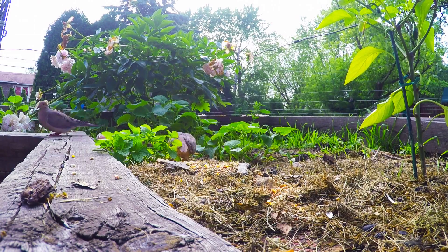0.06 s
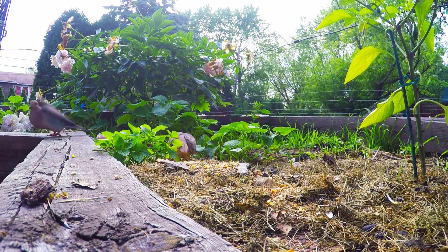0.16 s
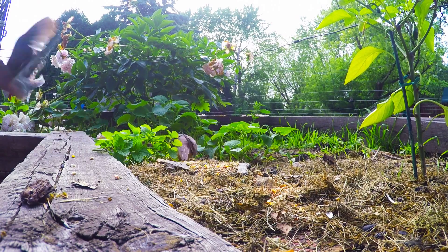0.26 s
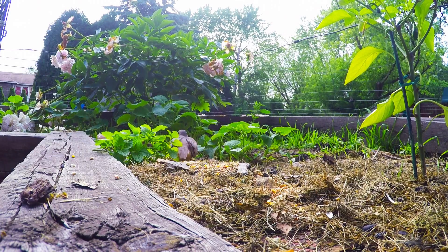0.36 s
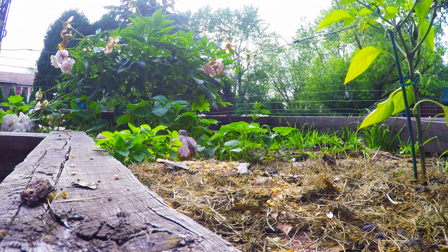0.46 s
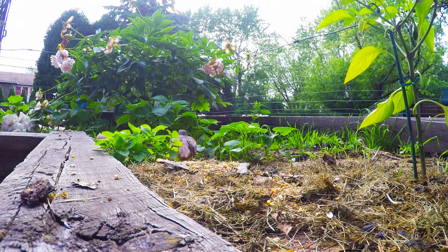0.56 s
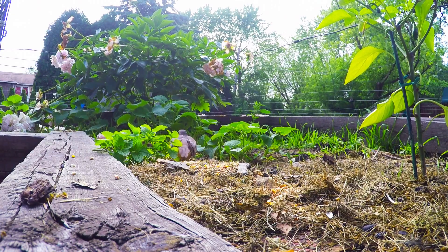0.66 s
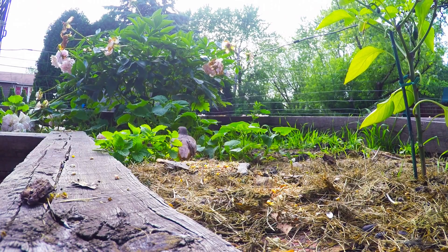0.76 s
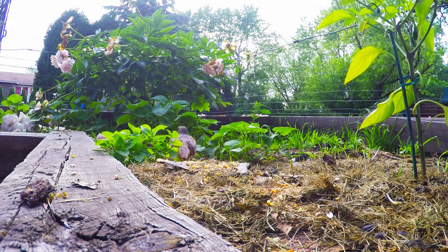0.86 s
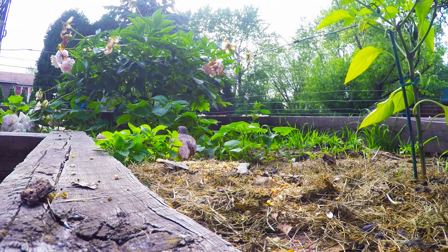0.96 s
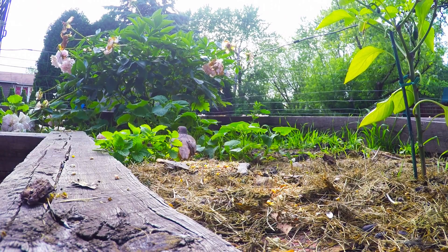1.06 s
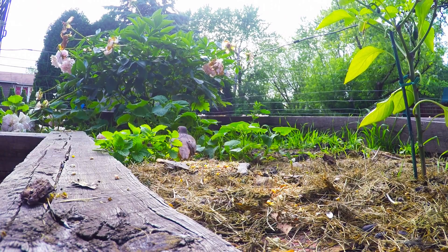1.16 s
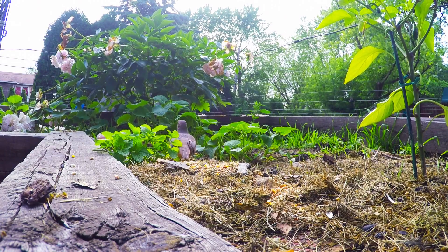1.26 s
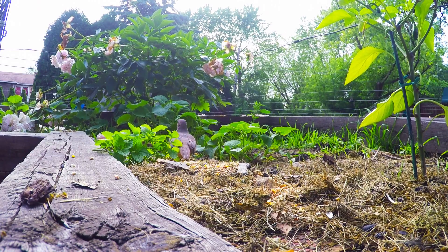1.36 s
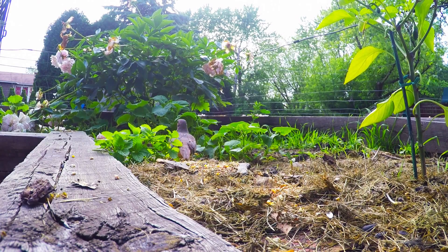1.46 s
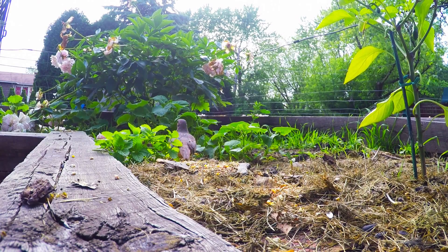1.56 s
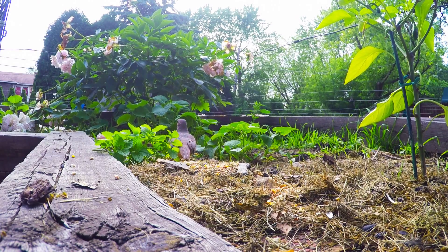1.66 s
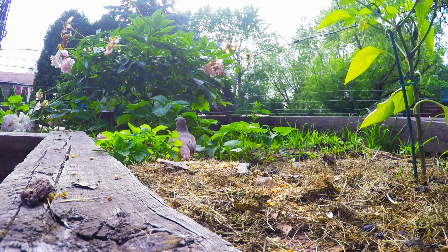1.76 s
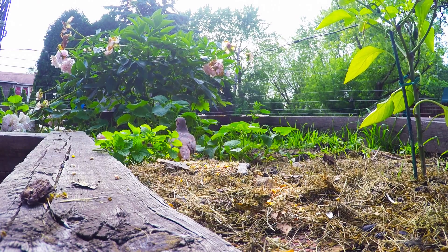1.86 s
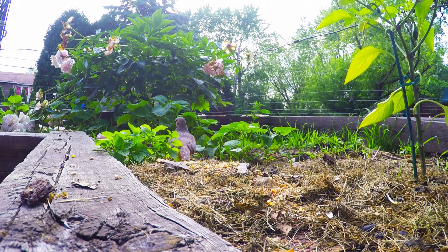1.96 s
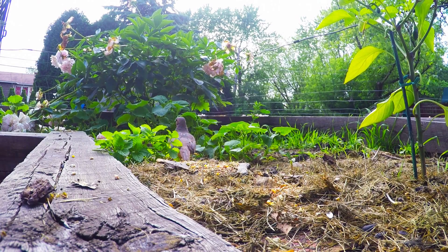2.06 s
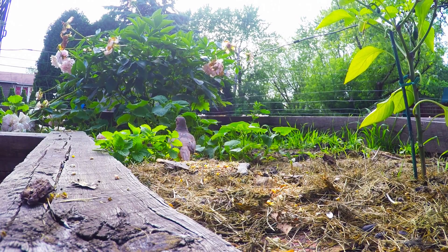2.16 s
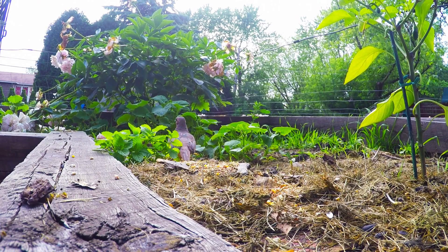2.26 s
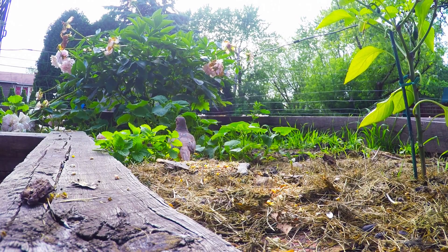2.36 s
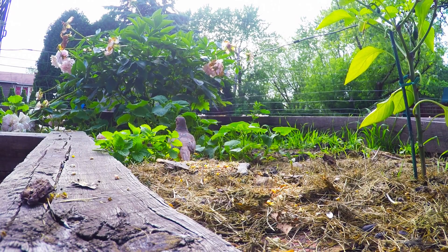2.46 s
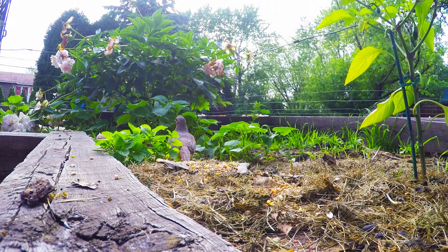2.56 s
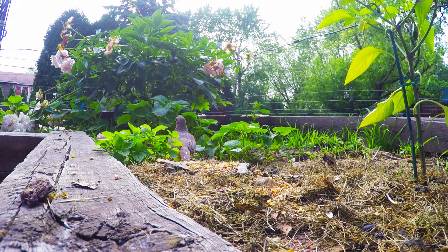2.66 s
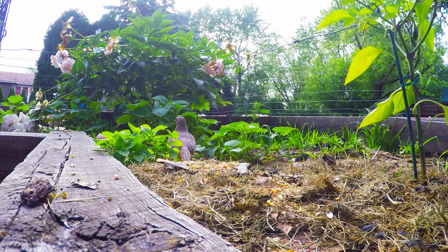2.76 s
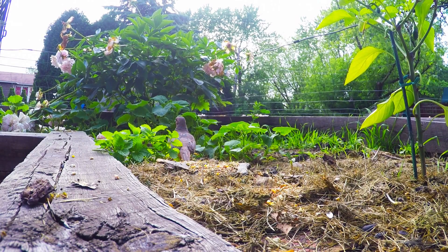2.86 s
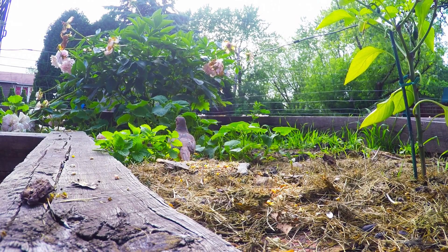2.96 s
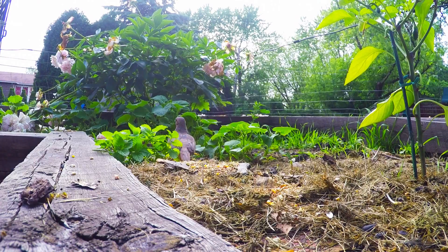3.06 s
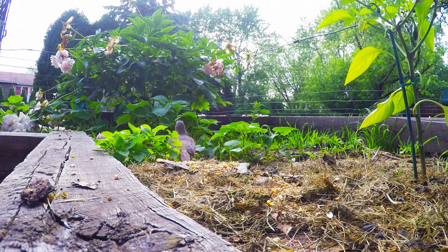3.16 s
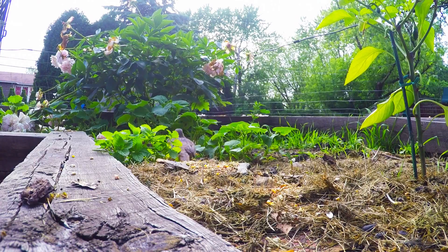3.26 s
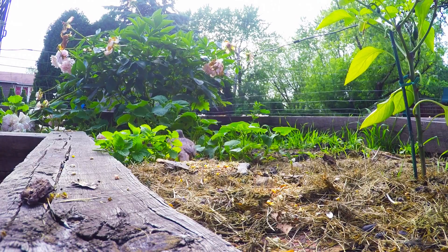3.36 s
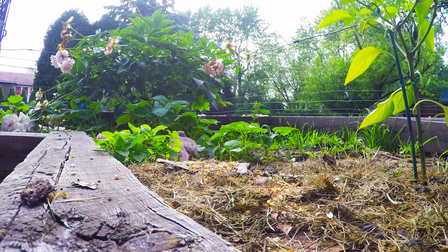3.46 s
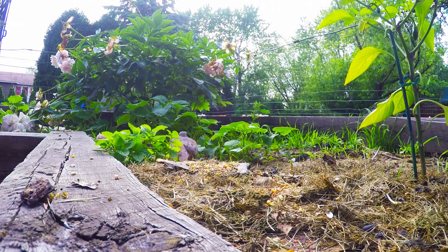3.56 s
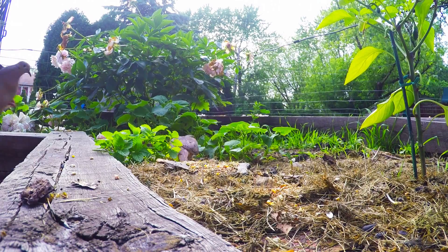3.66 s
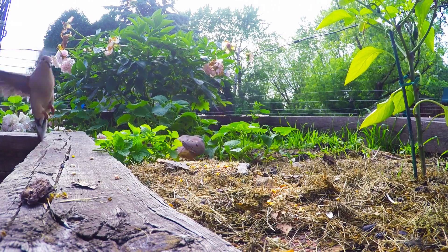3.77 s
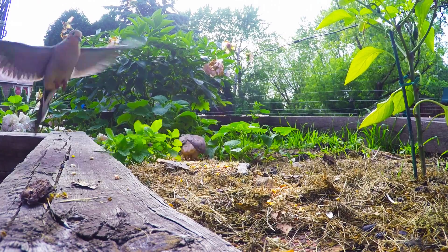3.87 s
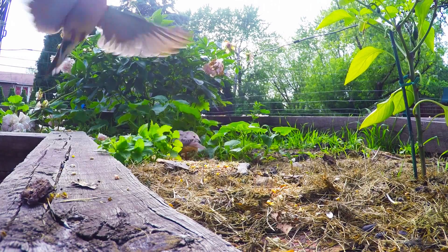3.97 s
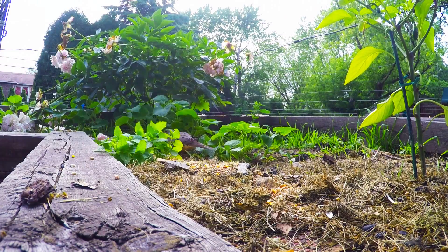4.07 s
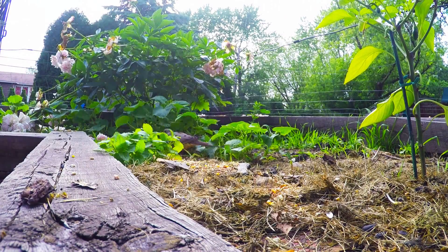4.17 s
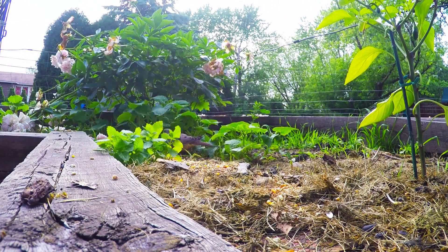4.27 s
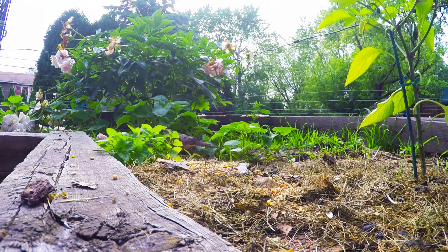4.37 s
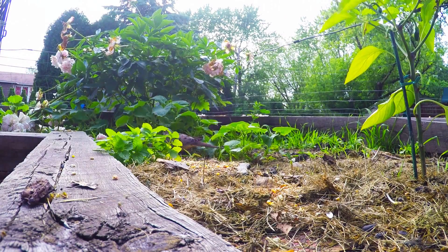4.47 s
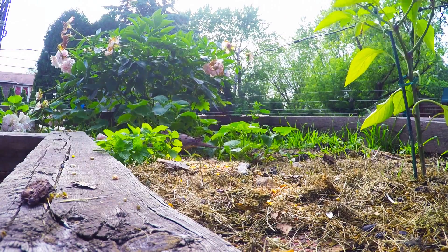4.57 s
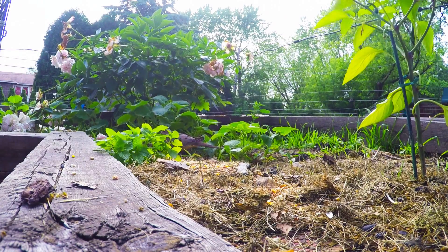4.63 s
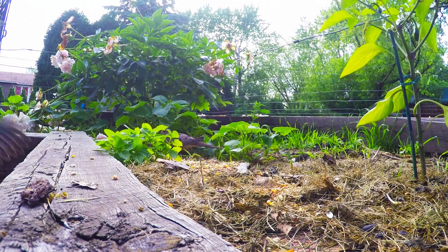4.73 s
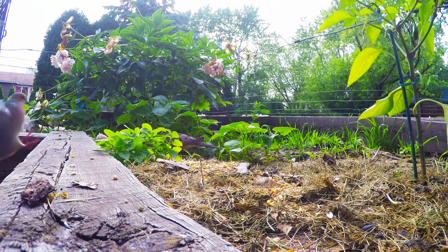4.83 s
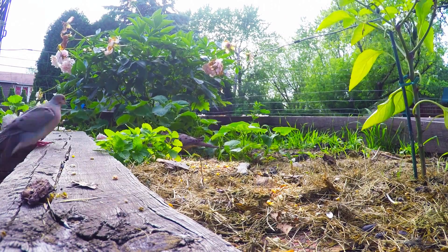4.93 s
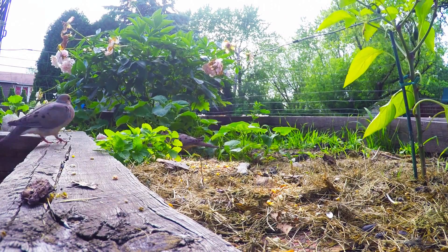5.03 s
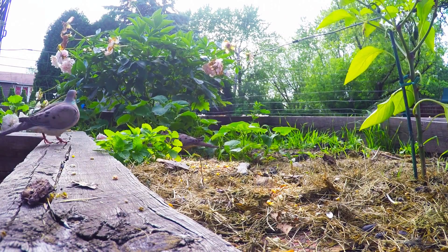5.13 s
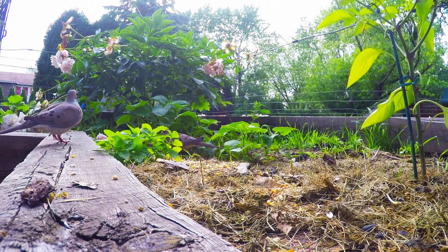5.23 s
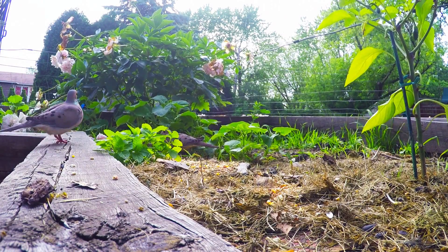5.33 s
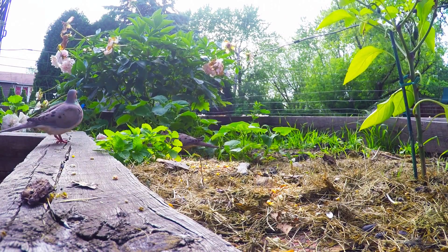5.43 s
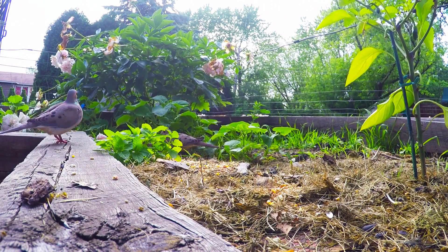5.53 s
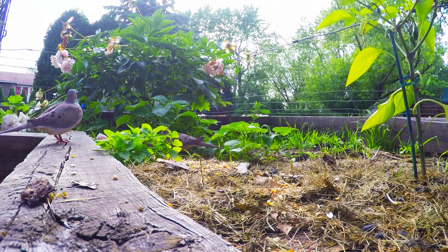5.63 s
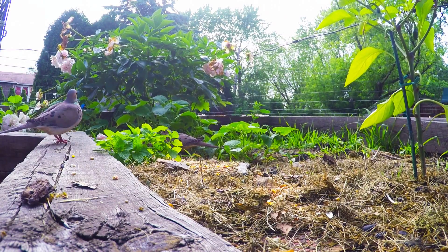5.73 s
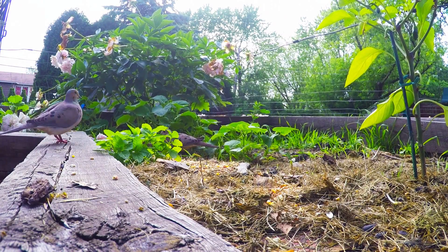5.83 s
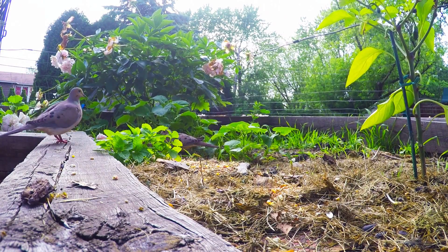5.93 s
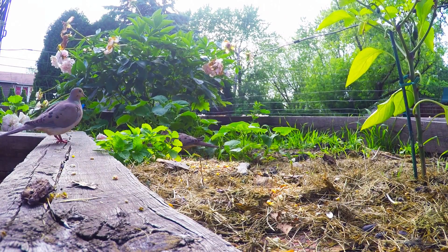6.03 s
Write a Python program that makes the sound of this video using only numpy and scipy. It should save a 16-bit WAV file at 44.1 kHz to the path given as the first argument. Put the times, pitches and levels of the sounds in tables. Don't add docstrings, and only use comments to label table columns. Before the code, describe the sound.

A dove flutters off in quick whistling wingbeats, coos faintly over a quiet garden rumble, then flies back with soft whistles and deep microphone thumps.

```python
import sys
import numpy as np
from scipy import signal
from scipy.fft import rfft, irfft
from scipy.io import wavfile
from scipy.ndimage import uniform_filter1d

SR = 44100
rng = np.random.default_rng(int(sys.argv[2]) if len(sys.argv) > 2 else 0)


def field_ratio(decibels):
    return 10 ** (np.asarray(decibels, dtype=float) / 20)


def bounce(signal):
    frames = np.transpose(np.atleast_2d(signal))
    limited = np.clip(frames, -1, 1)
    pcm = np.round(limited * 32767).astype(np.int16)
    wavfile.write(sys.argv[1], SR, pcm)


N = 268965
TIME = np.arange(N) / SR

# f/Hz, density/dB per Hz
GARDEN_SPECTRUM = [(8.8, -9), (15, 3), (97, -0.5), (130, -9), (150, -17), (184, -16.5), (286, -28),
                   (350, -32), (455, -34), (497, -36), (2140, -43.5), (4180, -43.5), (6870, -51),
                   (14700, -57.5), (16000, -83)]
# t/s, level/dB
BREEZE_SWELL = [
    (0.0, -42),
    (0.39, -39),
    (2.9, -43),
    (4.13, -27.5),
    (5.01, -48),
    (6.1, -39),
]
# t/s, length/ms, first f/Hz, last f/Hz, level/dB
BIRD_NOTES = [(.722, 23, 4900, 4900, -68), (1.11, 35, 4080, 5100, -70), (1.6, 33, 3700, 4900, -77),
              (1.32, 31, 4150, 4200, -72), (1.575, 29, 2900, 3060, -73), (1.624, 23, 4300, 4270, -59),
              (1.662, 28.3, 3296, 4270, -61), (1.68, 27, 4280, 4230, -60), (1.68, 48.5, 2950, 2560, -59.5),
              (4.305, 31.5, 5730, 4470, -70), (1.875, 65, 6600, 6850, -77), (1.857, 22, 4300, 4350, -73),
              (1.865, 14, 6100, 5200, -75), (1.69, 12, 7200, 6400, -74), (1.445, 35, 5200, 5200, -76),
              (1.665, 20, 3000, 2500, -70), (1.76, 33, 3500, 3450, -73), (.18, 40, 2900, 4600, -73),
              (1.885, 18.8, 3950, 4190, -69), (4.54, 75, 3340, 3300, -71), (5.103, 47, 4070, 3800, -68),
              (5.13, 45, 1890, 3600, -66.5), (5.165, 67, 3600, 2800, -66), (5.169, 40, 4170, 3230, -61.5),
              (5.71, 35, 4000, 4250, -71), (2.215, 19.5, 6030, 4420, -74), (2.42, 43, 6800, 6750, -78)]
# t/s, rise/ms, length/ms, peak level/dB
RUSTLE_STROKES = [(0.265, 24, 69, -53), (0.335, 9.6, 98, -49.5), (0.419, 7.4, 77, -49.5),
                  (0.509, 15, 100, -53), (0.627, 18, 87, -53.5), (0.76, 24, 49, -53.5), (0.9, 48, 96, -63),
                  (1.04, 22, 100, -62), (1.145, 25, 65, -58), (1.23, 12, 130, -63.5), (3.155, 13, 32, -62),
                  (3.2, 15, 103, -62), (3.35, 22, 160, -62), (3.44, 14, 130, -59), (3.54, 8.8, 78, -56),
                  (3.646, 12, 85, -58.5), (3.771, 38, 180, -55.5), (3.839, 7.9, 76, -50),
                  (3.93, 4.7, 140, -57), (4.01, 17, 97, -55), (4.1, 55, 77, -53), (4.19, 38, 79, -54),
                  (4.362, 21, 76, -54.5), (4.495, 20, 66.5, -55.5), (4.62, 19, 73, -56.5),
                  (4.768, 34, 73, -58), (4.87, 12, 52, -64.5)]
# f/Hz, density/dB per Hz
FEATHER_SPECTRUM = [(150, -3.5), (250, -7.5), (407, -18), (1160, -20), (3280, -23), (3520, -21.5),
                    (11700, -33.5), (14700, -32.5), (16000, -30)]
# t/s,
# length/ms, level/dB
CHURN_SPANS = [(.28, 200, -54), (1.23, 100, -64), (3.37, 50, -62), (3.78, 120, -56), (3.92, 160, -60),
               (5.88, 70, -67), (4.96, 50, -67), (4.36, 60, -60), (4.5, 50, -62), (4.77, 80, -60),
               (4.7, 40, -66), (3.69, 20, -60)]
# t/s, peak level of the top/dB, relative level of the middle/dB
CLAP_EVENTS = [(0.2808, -53, 13.5), (0.3503, -31, 4), (0.4295, -45.5, 12.5), (0.5224, -40.5, -2),
               (1.0717, -58.5, 9.5), (2.4999, -43.5, -24), (3.0885, -56, -6), (3.1586, -58, -2),
               (3.6538, -55, 0), (4.0214, -56, -3), (0.8984, -55, -8), (4.63, -58, 7), (3.168, -49, -13),
               (3.2252, -48, -6), (3.454, -63, 11), (3.5493, -54, 2), (3.8515, -46, -2), (1.186, -60, 6),
               (4.238, -56, 6), (3.9356, -51, 3), (4.0248, -67, 17), (4.108, -50.5, 11.5),
               (4.197, -48.5, 8.5), (4.3656, -47.5, 3), (4.503, -49, 5), (4.734, -64, 10),
               (4.779, -46.5, -5), (4.8304, -47.5, 1.5), (5.1307, -52.5, 0), (5.9095, -48, -10),
               (6.0436, -50, -3)]
# t/s, peak level/dB, centre f/Hz
FLAP_EVENTS = [(0.281, -31.5, 784), (0.347, -27.5, 483), (0.523, -43, 540), (1.07, -38.5, 523),
               (1.209, -40.5, 473), (1.245, -38.5, 537), (1.306, -39.5, 635), (3.829, -33.5, 615),
               (3.85, -33.5, 730), (3.936, -35.5, 555), (4.014, -46, 940), (4.198, -41, 476),
               (4.239, -36.5, 476)]
# t/s, length/ms, top f/Hz, level/dB, sag of pitch as the wing twists/share
WHISTLE_STROKES = [(0.289, 34, 1990, -33.5, 0.24), (0.363, 31, 2188, -29.5, 0.29),
                   (0.439, 31, 2136, -36, .12), (0.534, 33, 2143, -34.5, 0.13), (0.649, 25, 1900, -25, 0),
                   (0.78, 20, 1823, -35.5, 0.02), (1.074, 18, 1800, -43, 0), (1.155, 31.3, 1986, -40, 0.17),
                   (1.243, 14, 1900, -51.5, 0.3), (3.226, 18, 1920, -51.5, 0.05),
                   (3.374, 9, 1796, -53, 0.09), (3.472, 34, 1870, -52, 0.06),
                   (3.563, 27.5, 1977, -43.5, 0.03), (3.671, 31, 1978, -45.5, 0.06),
                   (3.79, 29, 2283, -41.5, .34), (3.86, 35, 2114, -43, 0.3), (3.949, 28, 2073, -43.5, 0.3),
                   (4.032, 37, 2120, -46, 0.44), (4.122, 32, 2044, -35, 0.4),
                   (4.204, 35, 2035, -37.5, 0.12), (4.382, 30.3, 2035, -36, 0), (4.512, 31.3, 1990, -39, 0),
                   (4.636, 31, 1910, -45, .02), (4.794, 22.7, 2045, -37.5, .22)]
SECOND_HARMONIC_DB = [-14, -10.5, -8, -7.5, -12.5, -10, -9, -12, -16, -10, -12, -10, -36, -14, -15.5, -15,
                      -2.5, -6, -15, -9, -11, -15, -17, -10]
# time of top/share of length, climb/share of pitch, gap between the wings/share of
# pitch, stall level/dB relative to the whistle
STROKE_BENDS = [(0.36, 0.133, 0.119, -30), (.28, .1, 0.0886, -30), (0.33, 0.146, 0.051, -10),
                (.4, 0.162, .03, -15.5), (.25, 0.018, 0.014, -26), (.4, .02, 0.017, -27),
                (.4, .02, 0.011, -24), (.42, .1, .06, -14), (.35, .12, .1, -14), (.3, 0.035, .04, -22),
                (.4, .03, 0.035, -20), (.5, .04, 0.018, -12), (0.65, 0.033, 0.014, -7.5),
                (0.48, 0.032, 0.016, -12), (0.614, .1, 0.084, -15), (0.47, 0.072, 0.074, -12),
                (.6, 0.051, .04, -22), (0.545, 0.031, 0.0396, -24), (0.635, .015, .015, -22),
                (0.73, 0.031, .02, -12), (0.54, 0.052, .025, -18), (0.86, .09, 0.014, -16),
                (.7, 0.061, .015, -18), (.3, 0.156, .08, -18)]
# level/dB, level/dB, relative to its top
OPEN_CLOSE_DB = [(0, -2.5), (-3, -3), (-3, -3), (-3, -8), (-1, -9), (-2, -7), (0.5, -4), (-2.5, -3),
                 (-1, -4), (0, -2), (1, 0), (-1, -1), (-1.5, 0), (-1, -3), (-4, -1), (-4, -3), (-6, -1),
                 (-2.5, 5), (-13, -1), (-4.5, -1.5), (-2.5, -2), (-1, -1), (3, -4), (-0.5, -1.5)]
# t/s, length/ms, first f/Hz, last f/Hz, level/dB
LOW_CHIRPS = [(0.334, 12.3, 1390, 1510, -35.5), (0.41, 9.2, 1275, 1350, -38.5),
              (0.53, 9.5, 1210, 1365, -51), (0.562, 9.3, 1080, 1130, -51.5), (0.772, 16, 1080, 1470, -57),
              (0.944, 12, 1270, 1080, -53.5), (1.07, 18, 1270, 1200, -51.5), (1.253, 18, 1290, 1280, -58),
              (3.24, 12, 1280, 1502, -61), (3.38, 32, 1277, 1295, -58), (3.464, 13, 1256, 1300, -56),
              (3.529, 16, 1063, 1011, -54), (3.548, 5, 1250, 1250, -49), (3.557, 9.7, 1240, 1260, -47),
              (3.664, 9.7, 1260, 1283, -48.5), (3.785, 8, 1290, 1255, -55),
              (3.832, 16.6, 1226, 1050, -41.5), (4.01, 17, 934, 975, -50), (4.027, 10, 1174, 1310, -54),
              (4.095, 14, 1040, 950, -60), (0.345, 6, 1400, 1300, -42), (0.421, 8, 1250, 1350, -46),
              (3.81, 7, 1850, 1650, -46), (4.058, 8, 1900, 1700, -48), (4.035, 9, 2100, 1800, -53),
              (3.888, 7, 1700, 1100, -52), (0.44, 4, 2000, 2000, -44), (3.835, 8, 2300, 2400, -54),
              (3.946, 6, 1250, 1300, -55), (3.393, 8, 1950, 2000, -59), (4.366, 5, 1700, 2300, -54),
              (4.732, 6, 2200, 3600, -56), (1.262, 25, 1700, 1100, -59), (3.403, 6.3, 1320, 1450, -53.5),
              (4.411, 5.7, 1190, 1230, -49)]
# t/s, suction level/dB, width/ms, rebound level/dB
GUST_VORTICES = [(0.334, -21, 6.6, -25), (0.359, -20.5, 3.6, -24.5), (0.402, -21, 11, -27.5),
                 (0.436, -23.5, 5.8, -29), (0.482, -20, 9.3, -32), (0.552, -16.5, 17, -18),
                 (0.662, -16.5, 15.6, -18), (0.712, -22.5, 10.8, -22.5), (0.781, -22, 13.5, -27.5),
                 (2.246, -25, 14.6, -29), (3.415, -26, 16, -28), (3.601, -27, 18, -31),
                 (3.832, -24, 20, -20.5), (3.855, -23, 6.4, -21), (3.894, -19, 5.1, -19),
                 (3.979, -24, 9.2, -19.5), (4.029, -29, 5.6, -24), (4.066, -14, 6.9, -12),
                 (4.154, -7.5, 7.9, -8), (4.218, -18.5, 13, -24), (4.243, -13.5, 11, -11),
                 (4.387, -17, 10.7, -19), (4.518, -17, 6.9, -23), (4.641, -21.5, 13, -26),
                 (4.746, -27, 12, -32), (4.812, -21, 12.6, -23.5), (6.05, -25, 5.2, -52)]
# t/s, level/dB
COO_LEVELS = [
    [(2.122, -52.5), (2.2, -48.5), (2.28, -52), (2.33, -66)],
    [(3.06, -68), (3.11, -62), (3.16, -55.5), (3.23, -57.5), (3.28, -72)],
]
# t/s, f/Hz
COO_PITCH = [
    (3.06, 425),
    (3.12, 482.7),
    (3.2, 477),
    (3.27, 455),
]


def level(x, db):
    return x * field_ratio(db) / np.sqrt(np.mean(x ** 2))


def band(x, lo_hz, hi_hz, order=2):
    return signal.sosfilt(signal.butter(order, (lo_hz, hi_hz), "bandpass", fs=SR, output="sos"), x)


def walk(rate, size=N):
    hold = max(int(SR / rate), 1)
    steps = np.repeat(rng.standard_normal(size // hold + 1), hold)
    return 1.37 * uniform_filter1d(uniform_filter1d(steps, hold), hold)[:size]


def coloured(points):
    hz, db = np.transpose(points)
    bins = np.maximum(np.arange(N // 2 + 1) * SR / N, 1)
    gain = field_ratio(np.interp(np.log(bins), np.log(hz), db))
    return irfft(rfft(rng.standard_normal(N)) * gain, N)


def envelope(tables, fade_s):
    gain = np.zeros(N)
    for table in tables:
        s, db = np.transpose(table)
        s = np.r_[s[0] - fade_s, s, s[-1] + 2 * fade_s]
        db = np.r_[-90, db, -90]
        inside = (TIME > s[0]) * (TIME < s[-1])
        gain = np.maximum(gain, field_ratio(np.interp(TIME, s, db)) * inside)
    return gain


def add(out, s, x):
    i = int(s * SR)
    out[i:i + len(x)] += x[:N - i]


def garden():
    bed = level(coloured(GARDEN_SPECTRUM), -38)
    low = signal.sosfilt(signal.butter(2, 66, fs=SR, output="sos"), bed)
    s, db = np.transpose(BREEZE_SWELL)
    rumble = level(low, 0) * field_ratio(np.interp(TIME, s, db) + 2.57 * walk(2.9))
    leaves = band(bed, 4200, 5200) * (field_ratio(0.277 * walk(1.62)) - 1)
    return (bed - low) * field_ratio(0.21 * walk(7.8)) + rumble + leaves


def songbirds():
    out = np.zeros(N)
    arch = 0.014
    for s, ms, first_hz, last_hz, db in BIRD_NOTES:
        mid_hz = (1 + arch) * (first_hz + last_hz) / 2
        n = int(ms / 1000 * SR)
        hz = np.interp(np.linspace(0, 1, n), (0, .5, 1), (first_hz, mid_hz, last_hz))
        hz = uniform_filter1d(hz, n // 4) * (1 + .012 * walk(250, size=n))
        note = np.sin(2 * np.pi * np.cumsum(hz) / SR) * field_ratio(2.5 * walk(200, size=n))
        add(out, s, field_ratio(db + 6.5) * signal.windows.tukey(n, .6) * note)
    slide_hz = np.interp(TIME, (1.62, 1.66, 1.8), (5800, 3600, 3300))
    slide = np.sin(2 * np.pi * np.cumsum(slide_hz) / SR)
    buzz = level(band(rng.standard_normal(N), 30, 820) * slide, 0)
    return out + buzz * envelope([[(1.62, -69), (1.64, -56), (1.68, -58.5), (1.79, -69)]], .01)


def rustle():
    start_db, end_db = -10, -10
    strokes = []
    for s, rise_ms, ms, db in RUSTLE_STROKES:
        strokes.append([(s, db + start_db), (s + rise_ms / 1000, db), (s + ms / 1000, db + end_db)])
    air = coloured(FEATHER_SPECTRUM)
    air = air / np.std(band(air, 7000, 15000))
    patches_db = 2.0 * walk(70) + 2.0 * walk(220) + 2.62 * walk(900) - 5.5
    return air * field_ratio(patches_db) * envelope(strokes, .016)


def churn():
    grains = rng.standard_normal(N) * field_ratio(4.5 * walk(140) + 1.5 * walk(30))
    spans = [[(s, db), (s + ms / 1000, db)] for s, ms, db in CHURN_SPANS]
    return level(band(grains, 450, 2560), 0) * envelope(spans, 0.005)


def claps():
    out, t = np.zeros(N), np.arange(700) / SR
    rise_s, decay_s = np.array([[.0005], [.0012]]), np.array([[.0017], [.0024]])
    for s, db, middle_db in CLAP_EVENTS:
        noise = rng.standard_normal((2, len(t)))
        noise[0] *= .6 + 4.0 * (rng.random(len(t)) < .025)
        noise[0, 25] = 6.0
        ticks, puff = noise * (1 - np.exp(-t / rise_s)) * np.exp(-t / decay_s)
        top = band(ticks, 5100, 16400)
        middle = field_ratio(middle_db + 11.0) * band(puff, 590, 4600)
        add(out, s, field_ratio(db + 1.0) * (top + middle))
    return out


def flaps():
    out, t = np.zeros(N), np.arange(2400) / SR
    for s, db, hz in FLAP_EVENTS:
        puff = level(band(rng.standard_normal(len(t)), 0.64 * hz, 1.36 * hz), db - 7.0)
        add(out, s, puff * (1 - np.exp(-t / 0.00039)) * np.exp(-t / 0.007))
    return out


def flutter(hz, over_db, apart, droop=0.26, top=0.37):
    out, n = 0, len(hz)
    along = np.linspace(0, 1, n)
    far_db = min(-12 + 90 * apart, -4)
    jitter = .009 + .22 * apart
    rough_db = 2.0 + 25 * apart
    peak = apart * np.exp(-((along - .8 * top) / .3) ** 2)
    sag = droop * rng.uniform(.5, 1.2) * np.abs((along - .35) / .65) ** 4
    for shift, db in ((0, -1.0), (peak - sag, far_db)):
        wobbling_hz = hz * (1 + shift + jitter * walk(514, size=n))
        phase = 2 * np.pi * (np.cumsum(wobbling_hz) / SR + rng.random())
        far_dulling = 30 * max(np.max(shift), 0)
        for k in range(7):
            tilt_db = over_db - 6.0 * (k - 1) + 2.5 - 9.0 * np.abs(along - top) - far_dulling * k
            gain = field_ratio(db + (k > 0) * tilt_db + rough_db * walk(344, size=n))
            out = out + gain * np.sin((k + 1) * phase)
    return np.sqrt(2) * out


def stall(hz, db):
    along = np.linspace(0, 1, int(0.0185 * SR))
    slide = field_ratio(db) * flutter(hz * (1 - 0.58 * along), -6.5, apart=0.172)
    wash = level(band(rng.standard_normal(len(along)), 950, 3800), db - 14.0)
    return np.sin(np.pi * along ** 0.28) ** 2 * (slide + wash)


def whistles():
    out = np.zeros(N)
    attack_ms, release_ms, start_db, end_db = 2.9, 3, -10, 0.5
    breath_db, stall_power = -20, 2.12
    strokes = zip(WHISTLE_STROKES, SECOND_HARMONIC_DB, STROKE_BENDS, OPEN_CLOSE_DB)
    for (s, ms, top_hz, db, sag), over_db, (top, climb, apart, stall_db), (open_db, close_db) in strokes:
        t = np.arange(-1.5, ms + 4, 1000 / SR)
        edge = np.clip(np.minimum((t - t[0]) / 2.1, (t[-1] - t) / 11), 0, 1)
        past = np.clip(t / (ms + 4), 0, 1) - top
        rising = climb * (past / top) ** 2
        falling = sag * np.abs(past / (1 - top)) ** stall_power
        hz = top_hz * (1 - np.where(past < 0, rising, falling))
        knots_ms = np.sort((0, attack_ms, top * ms, ms - release_ms, ms))
        knots_db = (open_db + start_db, open_db, 0, close_db, close_db + end_db)
        shape = edge * field_ratio(np.interp(t, knots_ms, knots_db))
        voice = level(flutter(hz, over_db, abs(apart), top=top), db)
        breath = band(rng.standard_normal(len(t)), 0.66 * top_hz, 1.45 * top_hz)
        add(out, s - .0015, shape * (voice + level(breath, db + breath_db)))
        add(out, s + ms / 1000 - .008, stall(hz[-1], db + stall_db))
    for s, ms, first_hz, last_hz, db in LOW_CHIRPS:
        along = np.linspace(0, 1, int(1.5 * ms / 1000 * SR))
        shape = np.sin(np.pi * along ** 0.5) ** 2
        hz = first_hz + along * (last_hz - first_hz)
        chirp = flutter(hz, -20.5, apart=.07, droop=0.12)
        add(out, s - .001, shape * level(chirp, db + 3.5))
    return out


def gusts():
    out, t = np.zeros(N), np.arange(-.03, .09, 1 / SR)

    def bump(at_ms, width_ms):
        return np.exp(-.5 * ((1000 * t - at_ms) / (width_ms / 2.51)) ** 2)

    for s, suck_db, ms, push_db in GUST_VORTICES:
        late_ms = 6.65 + 0.38 * ms
        swing = bump(late_ms, 1.44 * ms) - 0.33 * bump(2.34 * late_ms, 2.34 * ms)
        add(out, s + t[0], field_ratio(push_db) * swing - field_ratio(suck_db) * bump(0, ms))
    return out


def coos():
    pulses = np.zeros(N)
    periods = SR / 112 * (1 + .13 * rng.standard_normal(900))
    at = np.cumsum(periods).astype(int)
    strength = field_ratio(2.8 * rng.standard_normal(900))
    pulses[at[at < N]] = strength[at < N]
    growl = level(band(pulses, 355, 545, order=4), 0)
    hz = np.interp(TIME, *np.transpose(COO_PITCH)) * (1 + 0.01456 * walk(30.4))
    tone = np.sin(2 * np.pi * np.cumsum(hz) / SR)
    near = growl * envelope(COO_LEVELS[:1], .008)
    return near + (1.25 * tone + 0.68 * growl) * envelope(COO_LEVELS[1:], 0.04)


def echoes(x, t60_s, db):
    t = np.arange(int(.4 * SR)) / SR
    decay = np.exp(-np.log(1000) * t / t60_s)
    tail = rng.standard_normal(len(t)) * decay * np.minimum(t / 0.017, 1)
    return x + field_ratio(db) * signal.fftconvolve(x, tail / np.linalg.norm(tail))[:N]


def scene():
    near = echoes(rustle() + churn() + claps() + flaps() + whistles(), 0.21, -25.0)
    far = echoes(songbirds(), 0.13, -8.0) + echoes(coos(), 0.33, -7.5)
    fade = np.minimum(np.minimum(TIME / .004, (TIME[-1] - TIME) / .002), 1)
    return (fade * (garden() + near + gusts() + far))[None]


def top_cut(x):
    return signal.sosfilt(signal.butter(12, 16490, fs=SR, output="sos"), x)


def record(dry):
    bass_cut = signal.sosfilt(signal.butter(1, 6, "highpass", fs=SR, output="sos"), dry)
    mix = signal.sosfilt(signal.ellip(8, .2, 30, 15250, fs=SR, output="sos"), bass_cut)
    return top_cut(mix)


dry = scene()
out = record(dry)
bounce(out)
```